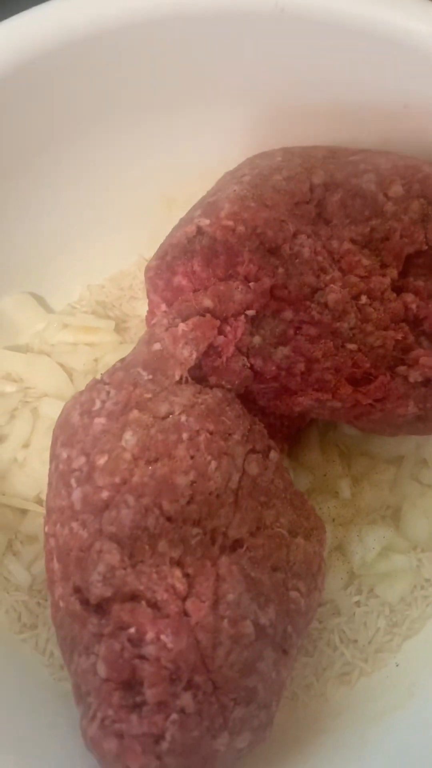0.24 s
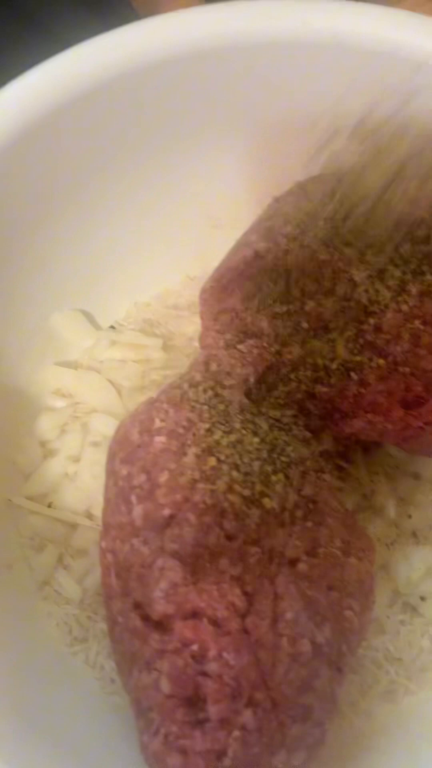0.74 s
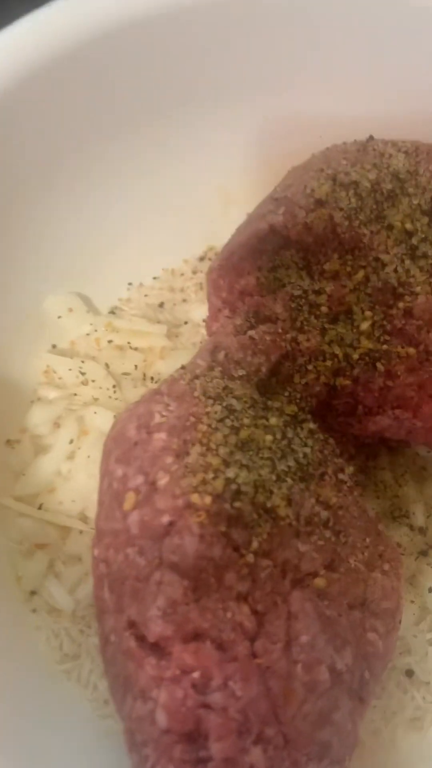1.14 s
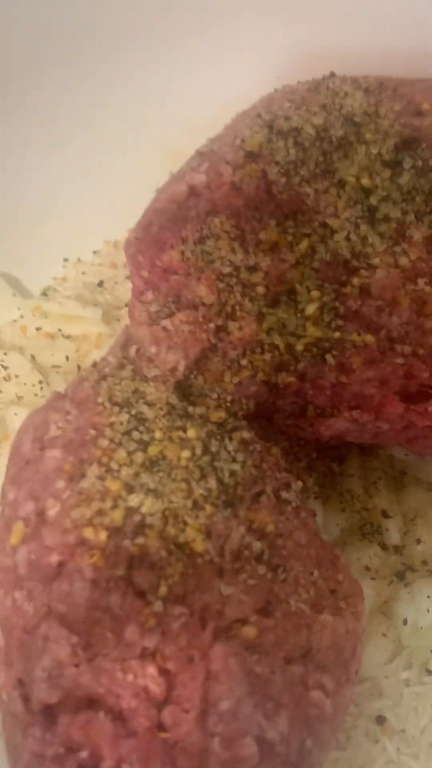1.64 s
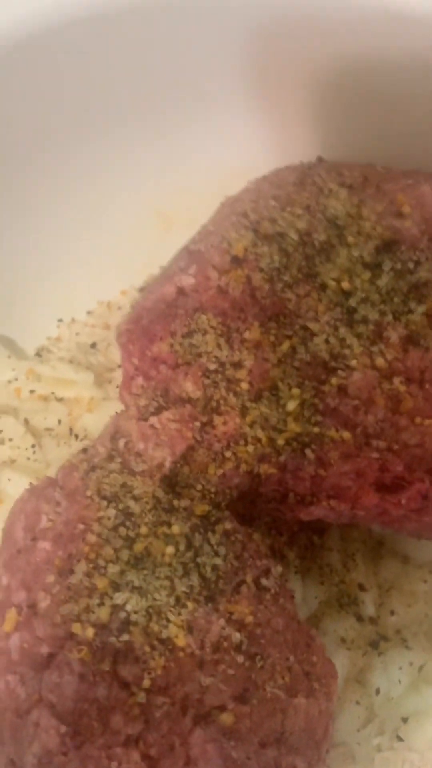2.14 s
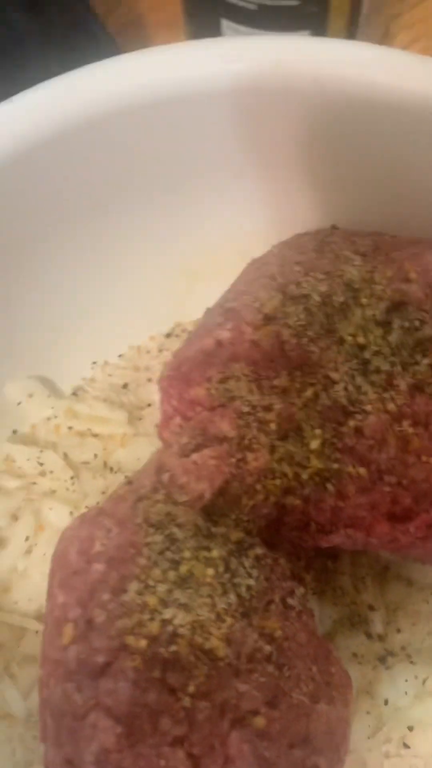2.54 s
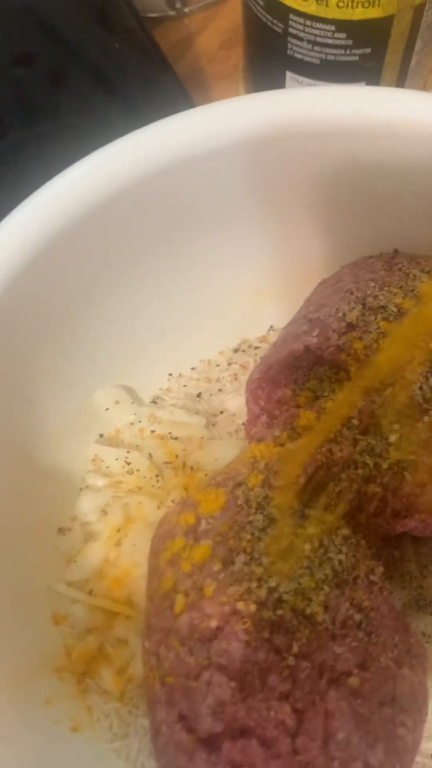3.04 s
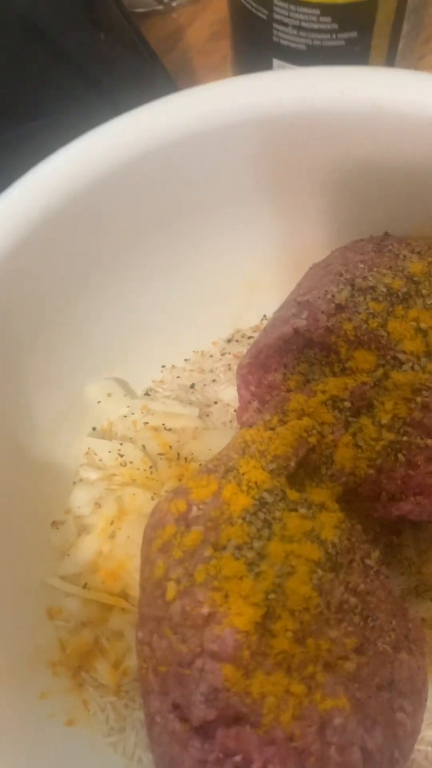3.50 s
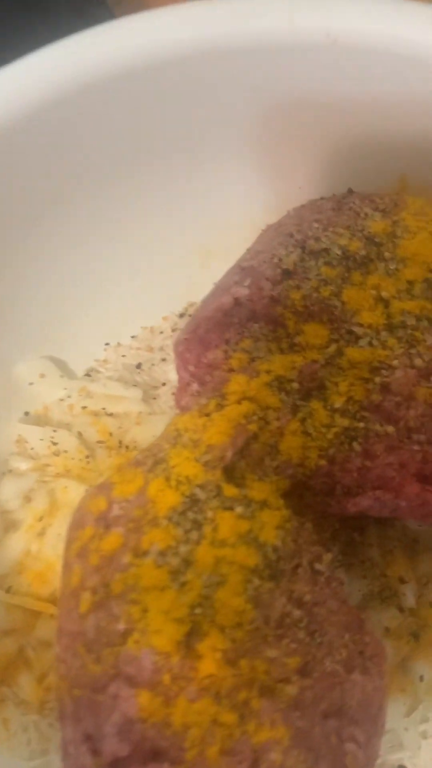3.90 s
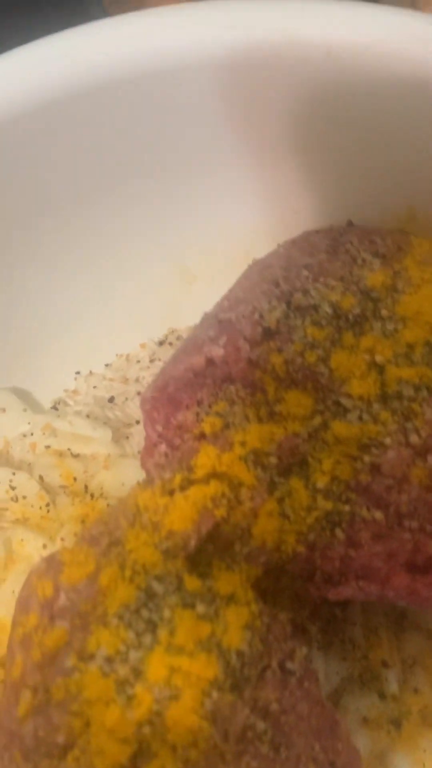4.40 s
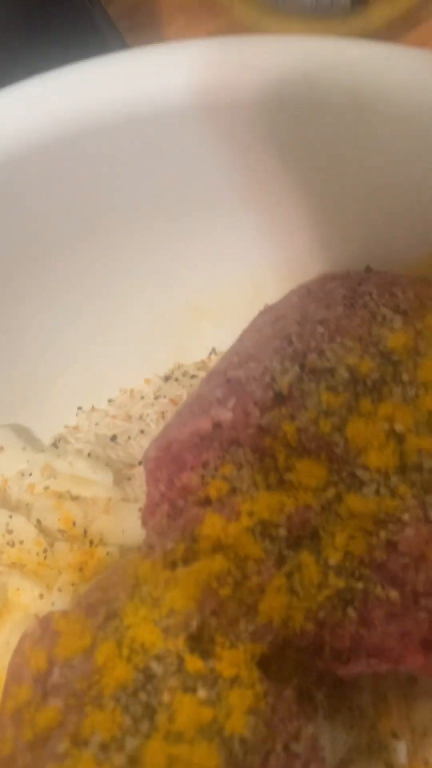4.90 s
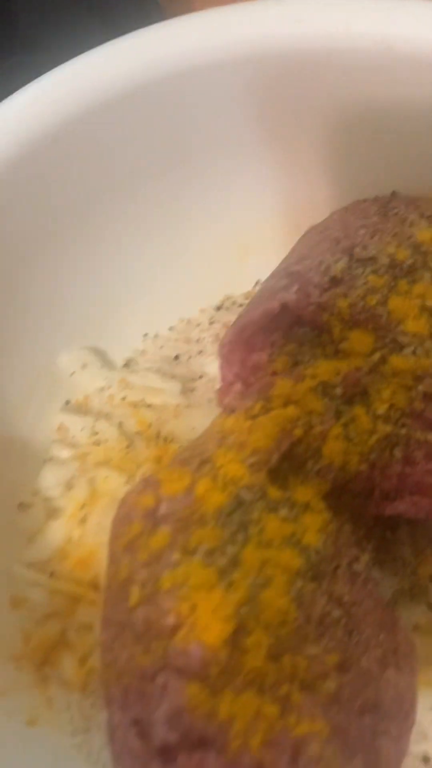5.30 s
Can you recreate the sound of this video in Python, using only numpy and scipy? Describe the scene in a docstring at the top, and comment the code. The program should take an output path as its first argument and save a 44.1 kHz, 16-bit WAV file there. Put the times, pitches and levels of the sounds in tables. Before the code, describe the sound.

In a small quiet kitchen, close to a phone microphone, dry spice hisses in several quick shakes with tiny pinging ticks. The bowl is bumped dully, a near-quiet gap follows with faint fridge hum, then a jar knocks hard on a hollow counter, rattles and settles. A short duller hiss of spice ends it.

```python
"""Dry spice hisses, slides and ticks as it is shaken from jars over meat in a bowl, close to a phone.
The spice is surges of noise grains, with small ticks as tiny cracks and pings. The bowl is bumped
and a jar is knocked and set down on a hollow counter: each blow rings a set of fading tones.
Behind it a fridge hums as a wavering tone over the rumble and hiss of a small kitchen."""
import sys
import numpy as np
from scipy import signal
from scipy.fft import rfft, irfft, next_fast_len
from scipy.io import wavfile
from scipy.ndimage import uniform_filter1d, map_coordinates

SR = 44100
rng = np.random.default_rng(int(sys.argv[2]) if len(sys.argv) > 2 else 0)


def boost_factor(decibels):
    """Convert a level in decibels to a linear amplitude factor."""
    exponent = np.asarray(decibels, float) / 20
    return 10 ** exponent


def transcribe(signal):
    """Save signal, clipped to [-1, 1], as a 16-bit WAV file at the path in sys.argv[1]."""
    frames = np.atleast_2d(signal).T
    limited = np.clip(frames, -1, 1)
    pcm = np.round(limited * 32767).astype(np.int16)
    wavfile.write(sys.argv[1], SR, pcm)


N = 244755  # length in samples


def unit(x):
    """Scaled to rms 1."""
    return x / np.sqrt(np.mean(x ** 2) + 1e-20)


def along(points, hz):
    """A curve through (f/Hz, value) points, read on a log frequency axis."""
    f, value = np.transpose(points)
    return np.interp(np.log(hz + 1), np.log(f + 1), value)


def wobble(rate):
    """A smooth random curve with `rate` new random values a second."""
    knots = rng.standard_normal(int(N * rate / SR) + 4)
    return map_coordinates(knots, [np.arange(N) * rate / SR])


def filtered(x, response):
    """x with each frequency multiplied by a response, which may also turn its phase."""
    m = next_fast_len(x.shape[-1] + 8192)
    spectrum = rfft(x, m) * response(np.fft.rfftfreq(m, 1 / SR))
    return irfft(spectrum, m)[..., :x.shape[-1]]


def patter(spectrum, clumps_per_s, clump_db):
    """Countless grains: noise that thickens and thins at random, coloured, rms 1."""
    grains = rng.standard_normal((2, N)) * boost_factor(clump_db * wobble(clumps_per_s))
    return unit(filtered(grains, lambda hz: boost_factor(along(spectrum, hz))))


SHARED_ABOVE_HZ = 4300  # above this, both sides are made from one shared signal
# how alike left and right are: f/Hz, likeness (1 = the same, 0 = unrelated)
LIKENESS = [(150, 0.88), (350, 1), (700, .5), (1100, 0.25), (1500, 0.2), (2000, 0.52), (2700, 0.19),
            (3600, 0.76)]


def spread(pair):
    """Two unrelated signals become left and right: the first is shared, the second differs."""
    def turn(hz):
        return np.arccos(np.clip(along(LIKENESS, hz), -1, 1)) / 2 * (hz < SHARED_ABOVE_HZ)

    mid, side = filtered(pair, lambda hz: np.array([np.cos(turn(hz)), np.sin(turn(hz))]))
    return np.array([mid + side, mid - side])


# colour of the kitchen's background noise: f/Hz, relative level/dB
KITCHEN_COLOUR = [(25, -16), (60, 3), (120, 1), (250, 1), (350, -5.5), (550, -17.5), (1200, -25),
                  (3000, -32.5), (8000, -38), (14000, -37.5), (16500, -48.5)]


def kitchen():
    """A low lumpy rumble under a faint, even hiss; the fridge's hum wavers in strength and pitch."""
    t = np.arange(N) / SR
    strength = boost_factor(3.5 * wobble(16))
    hum = boost_factor(-66.5) * strength * np.sin(2 * np.pi * 119 * t + wobble(12))

    def low(hz):
        return 1 / np.sqrt(1 + (hz / 450) ** 4)

    rumble = filtered(patter(KITCHEN_COLOUR, clumps_per_s=6.1, clump_db=1.5), low)
    hiss = patter(KITCHEN_COLOUR, clumps_per_s=11, clump_db=-0.7)
    hiss = filtered(hiss, lambda hz: np.sqrt(1 - low(hz) ** 2))  # what the rumble leaves out
    return boost_factor(-65.5) * rumble + boost_factor(-65) * hiss + [hum, 0.11 * hum]


# how long the kitchen's echo lasts: f/Hz, time to fall by 60 dB/s
ROOM_FADE = [(100, 0.72), (400, 0.19), (1500, 0.28), (4000, 0.22), (12000, 0.047)]


def room(x):
    """The kitchen's answer, new for every blow: noise in which each frequency dies at its own speed."""
    hz, t, z = signal.stft(rng.standard_normal((2, len(x))), SR, nperseg=256)
    fading = z * boost_factor(-60 * t / along(ROOM_FADE, hz)[:, None])
    tail = signal.istft(fading, SR, nperseg=256)[1]
    tail = filtered(tail, lambda f: f / (f + 400))  # a small room returns little of the lowest notes
    tail = tail / np.linalg.norm(tail[0])
    return signal.fftconvolve(x[None], tail, axes=1)[:, :len(x)]


# colour of loose grains jumping at a blow: f/Hz, relative level/dB
JOLT_COLOUR = [(500, -28.5), (1200, -1), (3000, -6), (7000, -19.5), (12000, -25), (16500, -28.5)]


def blows(table, modes, level_db, rise_cycles, rattle_db, rattle_s, room_db):
    """Every blow rings the same tones (modes); its row sets the balance of thud, body, ring and click."""
    out, t = np.zeros((2, N + SR)), np.arange(SR // 2) / SR
    hz, mode_db, t60 = np.transpose(modes)[..., None]
    swell = (1 - np.exp(-t * hz / rise_cycles)) ** 2  # low modes take longer to build up
    blur = hz * np.sqrt(2 * np.pi / 20000 / SR)  # high modes crowd together and lose their clear pitch
    for s, db, thud_db, ring_db, click_db in table:
        balance = [(140, thud_db), (220, 0), (540, 0), (700, ring_db), (1050, ring_db), (1500, click_db)]
        luck_db = rng.normal(0, 1.5, hz.shape)
        fade_db = mode_db + along(balance, hz) + luck_db - 60 * t / t60
        steps = blur * rng.standard_normal(swell.shape)
        drift = uniform_filter1d(np.cumsum(steps, axis=1), size=150, axis=1)
        ring = np.sum(swell * boost_factor(fade_db) * np.sin(2 * np.pi * hz * t + drift), axis=0)

        # loose grains jump, then settle more quietly
        jolt = unit(filtered(rng.standard_normal(len(t)), lambda f: boost_factor(along(JOLT_COLOUR, f))))
        settling = boost_factor(-60 * t / .008) + 0.05 * boost_factor(-60 * t / rattle_s)
        ring += boost_factor(click_db + rattle_db) * settling * jolt

        heard = boost_factor(room_db) * room(ring)
        heard[0] += ring  # the direct sound is shared by both sides
        start = round(s * SR)
        out[:, start:start + len(t)] += boost_factor(db + level_db) * heard
    return out[:, :N]


# jar against the counter: t/s, body level/dB before level_db, then thud, ring and click level/dB re body
JAR_KNOCKS = [(4.118, -47.5, -13, 6, -11), (4.132, -38, -4, 12, -13), (4.1435, -1, -24.5, -5, -17.5),
              (4.186, -16, -29.5, -13, -21), (4.213, -30.5, -21, -15.5, -20), (4.262, -41, -9.5, -9, -22.5),
              (4.286, -31, -16, 0, -14), (4.2990, -7.5, -39, -12, -22.5), (4.3225, -10.5, -41.5, -8.5, -25),
              (4.374, -36, -31.5, -12, -33), (4.624, -40.5, -4.5, -19, -9.5), (4.66, -49.5, 14, -15, -6),
              (4.7115, -21, 10.5, -32, -23.5)]
# tones of the hollow counter: f/Hz, relative level/dB, time to fall by 60 dB/s
COUNTER_MODES = [(127, 0.5, .3), (177.8, -10, 0.14), (238, -21, .15), (273.7, -6, 0.11), (313.4, -3, 0.15),
                 (381.4, -7.5, 0.092), (408, 3, 0.049), (515.3, -2.5, 0.032), (642, 6.5, 0.039),
                 (727, -6, .08), (883, -10, 0.04), (961, -6, 0.078), (1121, -7.5, 0.04), (1178, -12, .1),
                 (1377, -12, 0.26), (1500, -8.5, .07), (1790, -4, .05), (2000, -7.5, 0.033),
                 (2327, -5, 0.024), (2780, -11, 0.024), (3485, -16.5, 0.0091)]


def counter():
    """A jar is knocked and set down on the hollow counter, whose tones ring out."""
    return blows(JAR_KNOCKS, COUNTER_MODES, level_db=-1.5, rise_cycles=0.68,
                 rattle_db=-6.0, rattle_s=0.28, room_db=-7.5)


# bumps of the bowl: t/s, body level/dB before level_db, then thud, ring and click level/dB re body
BOWL_BUMPS = [(1.2400, -36.5, -3, 6, 0.5), (1.4925, -18, -8, -12, -20.5), (1.551, -52, 22.5, 15, -40),
              (1.570, -36.5, -4, -6, -17), (1.5875, -25.5, -2.5, -8, -26.5), (1.628, -34.5, -21, -2, -5.5),
              (1.652, -27, -8, -17, -22), (1.669, -35, -8, -9, -15), (1.925, -50, 5, 5, -4.5),
              (2.187, -47, -8, -14, -30), (2.1975, -30, -46, -26, -35), (2.2025, -28.5, -35, -15.5, -37),
              (2.219, -40, -21, -30, -36), (2.265, -39.5, -7.5, -23, -32.5), (2.299, -54, 6.5, -14, -21),
              (2.730, -55, 7.5, 1, -21), (2.823, -51, 2.5, -30.5, -39.5), (3.983, -52, -11, -14, -8.5)]
# tones of the bowl: f/Hz, relative level/dB, time to fall by 60 dB/s
BOWL_MODES = [(81, 1.5, 0.14), (123, 3.5, 0.073), (211, -9, 0.082), (338, -1, 0.04), (426, 0, 0.03),
              (618.5, -2.5, .03), (750, -5.5, .03), (870, -2, 0.014), (1250, -4, .025), (1640, -6, .03),
              (1870, -2, 0.017), (3350, -16, 0.016)]


def bowl():
    """The bowl is bumped, and its short tones die within a fraction of a second."""
    return blows(BOWL_BUMPS, BOWL_MODES, level_db=5.0, rise_cycles=0.6,
                 rattle_db=-14.0, rattle_s=0.091, room_db=-5.0)


ROUNDNESS = 1.144  # shape of a surge: 1 = pointed crest, 2 = round
TRICKLE_DB = -92.5  # the few grains that fall between surges
# surges of spice noise, from shakes of the jar and short rattles at knocks and bumps:
# t/s of fullest flow, flow level/dB, swell/s, fade/s, coarse grains' level/dB re flow
# (swell and fade each span 20 dB)
SPICE_SURGES = [(0.02, -50, 0.23, 0.32, -9.5), (0.162, -43.5, 0.1, 0.14, -8),
                (0.26, -43, 0.084, 0.093, -12), (0.33, -40, 0.088, 0.084, -12.5),
                (0.435, -53.5, .1, 0.13, -6), (0.515, -39, 0.083, 0.077, -12), (0.7, -47.5, 0.25, .15, -7),
                (0.779, -37.5, 0.027, 0.32, -4.5), (0.871, -41.5, 0.1, .15, -0.5), (1.0, -54, 0.14, .3, -2),
                (1.28, -57.5, 0.038, .2, -2), (1.36, -49, 0.19, 0.14, -3.5),
                (1.499, -54, 0.027, 0.049, 2.5), (1.61, -69, 0.41, .09, 4), (1.933, -65, 0.021, 0.056, 7),
                (2.734, -76, 0.017, 0.02, 4.5), (2.93, -82.5, 0.065, .15, -4), (3.26, -86.5, 0.13, .2, -11),
                (3.665, -75, .035, 0.14, -16), (3.993, -81.5, .06, 0.036, 2.5),
                (4.628, -56, 0.015, 0.021, -4), (4.675, -76, 0.053, 0.062, 9.5),
                (4.721, -52.5, 0.025, 0.056, 1), (4.95, -71, .035, .05, -10), (5.21, -67, 0.047, .3, -12),
                (5.285, -42, 0.044, 0.23, -13.5), (5.55, -50.5, 0.12, .1, -17.5)]


def streams():
    """Strength of the fine and the coarse stream: every surge swells to its crest and fades."""
    s, db, swell, fade, coarse_db = np.transpose(SPICE_SURGES)[..., None]
    t = np.arange(0, N + 64, 64) / SR
    away = np.where(t < s, (s - t) / np.abs(swell), (t - s) / np.abs(fade))
    power = boost_factor(db - 20 * away ** ROUNDNESS) ** 2
    fine_power = power.sum(axis=0)
    coarse_power = (power * boost_factor(coarse_db) ** 2).sum(axis=0)
    return [np.interp(np.arange(N) / SR, t, np.sqrt(p + boost_factor(TRICKLE_DB) ** 2))
            for p in (fine_power, coarse_power)]


STRAYS_PER_S = 60
STRAY_DB, STRAY_SPREAD_DB = 5.5, 3.5  # level re the coarse stream at that moment, and its random spread
STRAY_PING_DB, STRAY_PING_HZ = -8.5, 2250  # ping level setting, and the middle of the ping pitches


def strays():
    """Rows like those of the small ticks, for grains that leave the coarse stream at random."""
    luck = rng.standard_normal((int(STRAYS_PER_S * N / SR), 2))
    s = rng.uniform(0, (N - 1) / SR, len(luck))
    coarse = streams()[1][(s * SR).astype(int)]
    db = 20 * np.log10(coarse) + STRAY_DB + STRAY_SPREAD_DB * luck[:, 0]
    ping_hz = STRAY_PING_HZ * np.exp(0.21 * luck[:, 1])
    return list(zip(s, db, np.full(len(s), STRAY_PING_DB), ping_hz))


# small ticks and taps, mostly single grains, with one low tap near 2.73 s:
# t/s, level/dB and ping level/dB re it (both before fixed boosts), ping f/Hz
SMALL_TICKS = [(0.0955, -39.5, -24, 3950), (0.257, -36, -23, 3380), (0.348, -36.5, -25, 4090),
               (0.41, -41, -33, 1420), (0.7, -35.5, -24, 4090), (0.7246, -34.5, -21, 2610),
               (0.745, -34.5, -3, 2600), (0.7585, -31.5, -11, 2200), (0.7732, -26, -5, 2570),
               (0.934, -31.5, 3, 2060), (0.948, -37, -4, 2070), (0.9742, -25, 0, 2380),
               (1.0092, -34, -4, 2650), (1.013, -27, -8.5, 2560), (1.025, -36, -16, 1460),
               (1.0553, -33.5, -20, 2390), (1.6249, -52, 10, 1450), (2.731, -69, 26, 900),
               (3.8081, -67.5, 9, 3400), (4.6225, -42, 8, 3630), (4.7841, -47, -26.5, 1700),
               (4.821, -62, -19, 1570), (5.1314, -58, -11, 4040), (5.1472, -60, -22, 2660),
               (5.2535, -45, -22, 2570), (5.2733, -37.5, -19, 4050)]
# colour of a tick's crack: f/Hz, relative level/dB
CRACK_COLOUR = [(900, -43), (1700, -10.5), (4000, -1), (8000, 1), (16000, -2.5), (16800, -24)]


def ticks():
    """Small ticks and taps: each is a crack of a millisecond or two and a short ping."""
    cracks, pings, t = np.zeros((2, N + SR)), np.zeros(N + SR), np.arange(SR // 40) / SR
    for s, db, ping_db, ping_hz in SMALL_TICKS + strays():
        crack = rng.standard_normal((2, len(t))) * boost_factor(-60 * t / .008)
        crack /= np.linalg.norm(crack, axis=1, keepdims=True)
        ping_shape = boost_factor(-60 * t * ping_hz / 26) * (1 - np.exp(-t / 0.00035))  # falls 60 dB in 26 cycles
        ping = ping_shape * np.sin(2 * np.pi * ping_hz * t)
        start = round(s * SR)
        at = slice(start, start + len(t))
        cracks[:, at] += boost_factor(db + 19) * crack
        pings[at] += boost_factor(db + ping_db + 3.5) * ping
    cracks = filtered(cracks, lambda hz: boost_factor(along(CRACK_COLOUR, hz)))
    late_pings = .5 * np.roll(pings, 9)  # a slightly later copy sets left and right apart
    return (cracks + [pings, late_pings])[:, :N]


LAST_JAR_S = 5.17  # from here on a duller spice falls
# colours of fine grains, coarse grains and spice sliding inside the jar: f/Hz, relative level/dB
FINE_COLOUR = [(2500, -48), (3800, 0), (6000, 1.5), (8000, 3.5), (11000, 2.5), (14000, 1.5), (16000, -3),
               (16800, -24)]
COARSE_COLOUR = [(900, -40.5), (1400, -9), (2000, -2), (3000, -5.5), (4000, -3.5), (5500, -32)]
SLOSH_COLOUR = [(150, -26.5), (320, 3), (500, -4.5), (1100, -3), (1600, -7), (2500, -48)]
# colour of the duller spice compared with the fine grains: f/Hz, level/dB
DULLER_COLOUR = [(3000, -4), (6500, 5), (8000, -2.5), (11000, -4), (16000, -3.5)]
# how hard the jar is swung, heard as spice sliding inside it: t/s, level/dB
JAR_SWING = [(0, -55), (.09, -63), (.17, -49.5), (.4, -59), (.52, -56.5), (.7, -62.5), (.95, -56),
             (1.2, -60), (1.42, -55.5), (1.5, -64), (1.75, -100), (4.6, -100), (4.72, -51), (4.8, -82.5),
             (5.2, -84), (5.3, -67.5), (5.55, -80)]


def spice():
    """Each surge is a stream of fine and coarse grains; the rest slides about inside the jar."""
    fine, coarse = streams()
    t = np.arange(N) / SR
    swing_db = np.interp(t, *np.transpose(JAR_SWING)) + 1.5 * wobble(17)
    dust = patter(FINE_COLOUR, clumps_per_s=100, clump_db=0.5)
    dull_dust = filtered(dust, lambda hz: boost_factor(along(DULLER_COLOUR, hz)))
    dust = np.where(np.arange(N) < LAST_JAR_S * SR, dust, dull_dust)
    grains = fine * dust + coarse * patter(COARSE_COLOUR, clumps_per_s=350, clump_db=1.5)
    slosh = boost_factor(swing_db) * patter(SLOSH_COLOUR, clumps_per_s=60, clump_db=2.0)
    flicker = boost_factor(1.6 * wobble(120))
    return flicker * (grains + slosh)


def scene():
    """All sources as a shared and a differing part, spread to left and right."""
    struck = bowl() + counter()
    no_bass = signal.butter(4, 52, "high", fs=SR, output="sos")  # small bodies radiate no deep bass
    struck = signal.sosfilt(no_bass, struck)
    return spread(kitchen() + struck + ticks() + spice())


# phase between the sides: f/Hz, half turns by which left leads
SIDE_LEAD = [(0, 0), (250, -.04), (450, -.3), (750, -.5), (1100, .1), (2000, .4), (2500, .7), (3300, .3),
             (4350, 1), (5100, 1), (5500, 1.5), (6400, 2), (7450, 2), (8300, 3), (9500, 3), (10400, 4),
             (11750, 4), (12600, 5), (13700, 5), (14600, 6), (22050, 6)]
# loudness between the sides, used below SHARED_ABOVE_HZ: f/Hz, left minus right level/dB
SIDE_TILT = [(200, 0.6), (700, -2.5), (1500, -1), (2500, 0), (3600, 0)]


def two_sides(x):
    """Left and right differ in phase and level, as heard; each side takes half of the difference."""
    def skew(hz):
        level = boost_factor(along(SIDE_TILT, hz) / 2 * (hz < SHARED_ABOVE_HZ))
        return level * np.exp(.5j * np.pi * np.interp(hz, *np.transpose(SIDE_LEAD)))

    return filtered(x, lambda hz: np.array([skew(hz), 1 / skew(hz)]))


def low_pass(x):
    """Removes everything above the highest recorded frequency."""
    return signal.sosfilt(signal.butter(12, 16960, fs=SR, output="sos"), x)


def record(dry):
    """The microphone loses the deep bass; left and right are then set apart in phase and level."""
    bass_cut = signal.butter(2, 22, "high", fs=SR, output="sos")
    mix = two_sides(signal.sosfilt(bass_cut, dry))
    return low_pass(mix)


dry = scene()
out = record(dry)
transcribe(out)
```